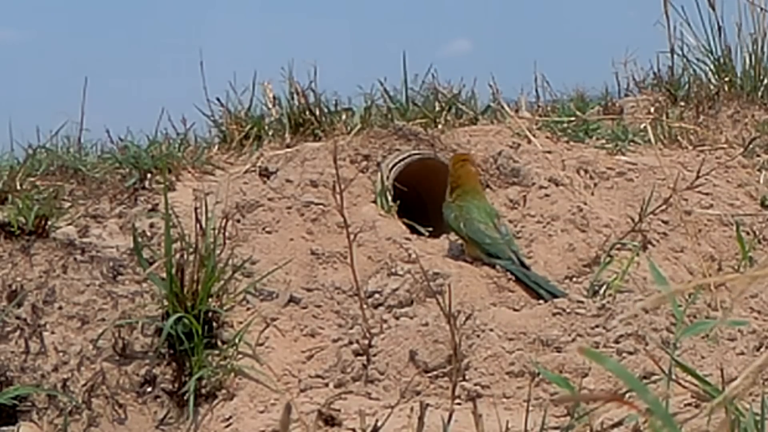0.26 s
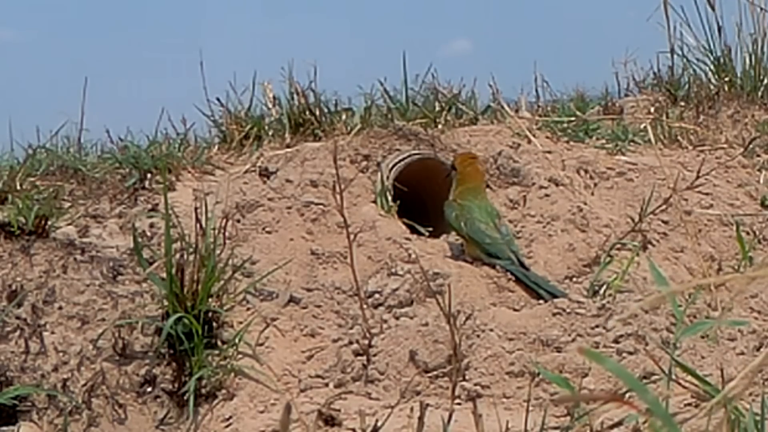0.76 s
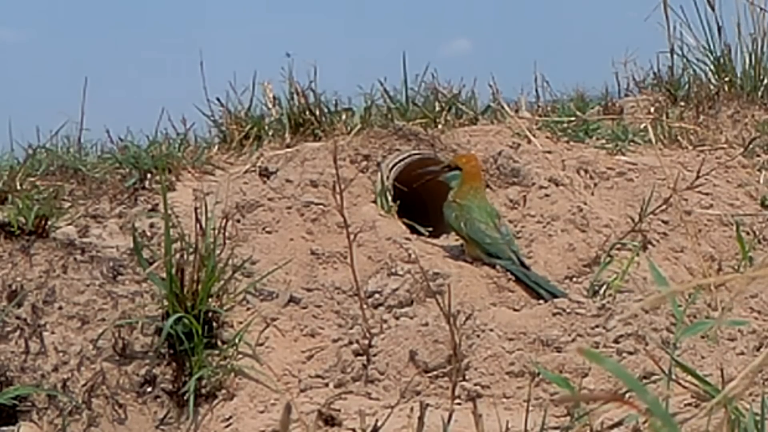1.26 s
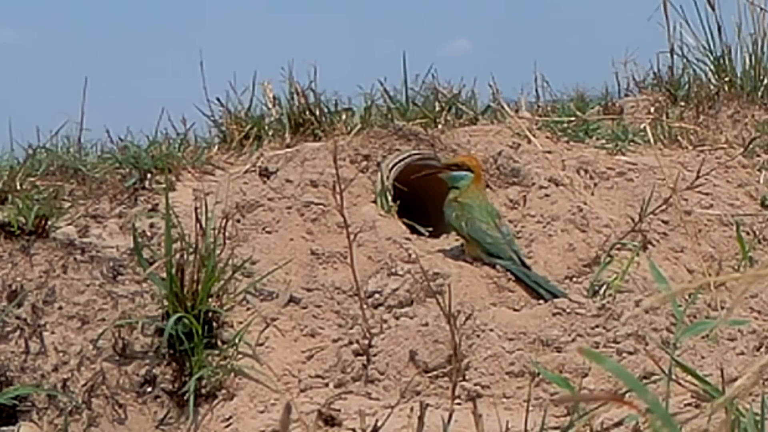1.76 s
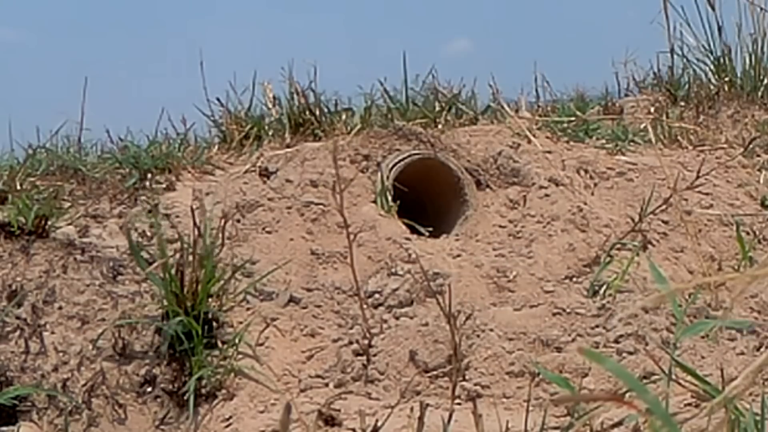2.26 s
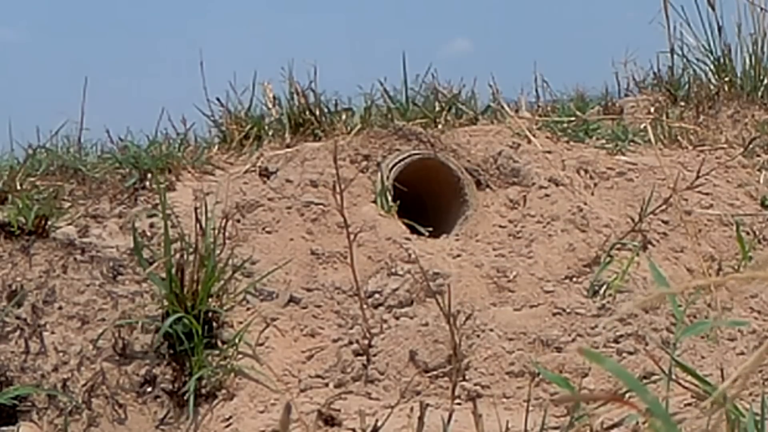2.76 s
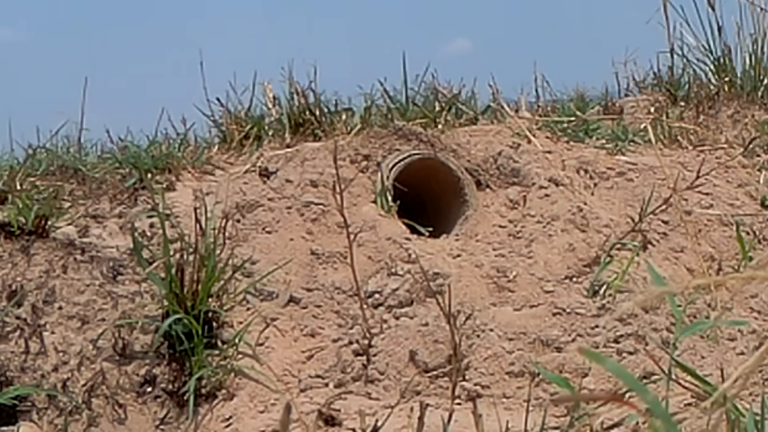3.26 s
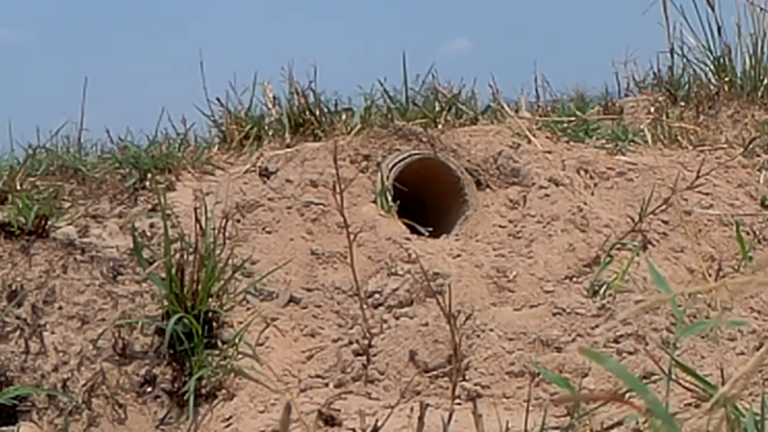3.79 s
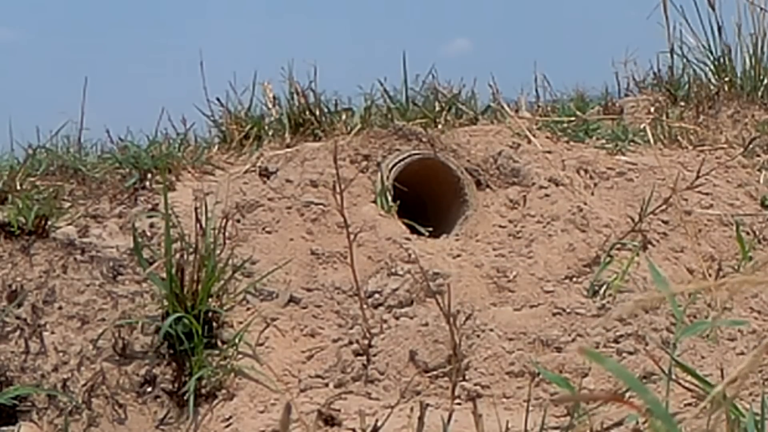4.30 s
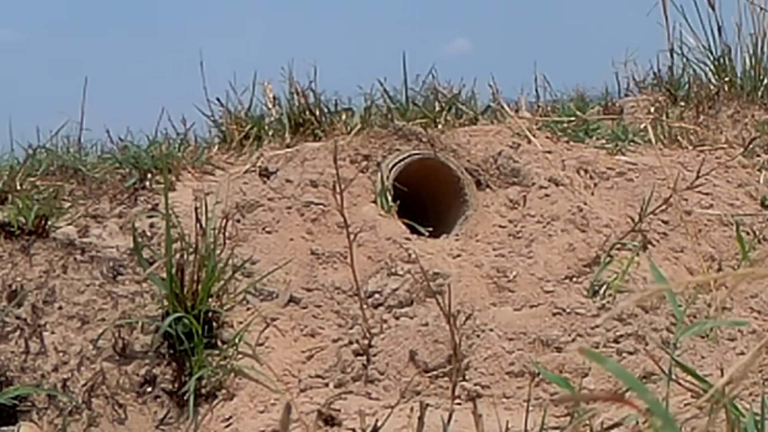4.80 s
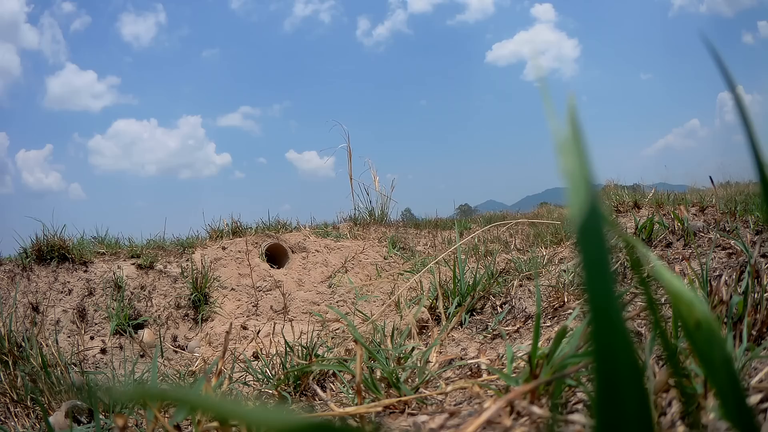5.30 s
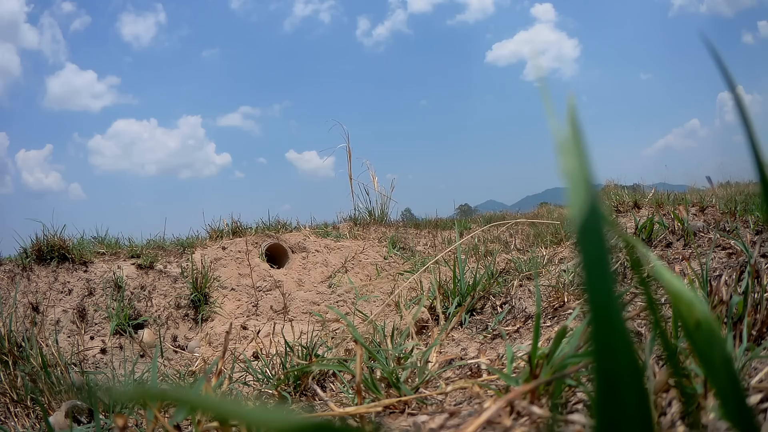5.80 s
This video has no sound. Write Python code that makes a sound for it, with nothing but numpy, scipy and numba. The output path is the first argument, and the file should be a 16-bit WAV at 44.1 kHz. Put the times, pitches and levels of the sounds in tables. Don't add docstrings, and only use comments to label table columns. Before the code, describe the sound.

A small camera outdoors picks up soft hiss and a faint distant bird repeating an arched whistle, a slowing trill and a short downward slide. At two seconds a bee-eater leaves its burrow in a sand bank with ten rapid high chirps, each rising then falling with tiny clucks between. They grow loud, then fade as it flies off. Extra hiss lingers and slowly dies, with one tiny dip near the end.

```python
import sys
import numpy as np
from scipy import signal
from scipy.fft import rfft, irfft
from scipy.io import wavfile
from scipy.ndimage import uniform_filter1d
from numba import njit

SR = 44100
rng = np.random.default_rng(int(sys.argv[2]) if len(sys.argv) > 2 else 0)


def dump(signal):
    limited = np.clip(np.atleast_2d(signal).T, -1, 1)
    pcm = np.round(limited * 32767).astype(np.int16)
    wavfile.write(sys.argv[1], SR, pcm)


def gain_from_decibels(decibels):
    exponent = np.asarray(decibels, float) / 20
    return 10 ** exponent


N = 266805
T = np.arange(N) / SR

# t/s, length/ms, top f/Hz, level/dB, warble/0-1
ARCHES = [
    (-.035, 83, 3400, -55, 0.78),
    (0.108, 62, 3940, -50.5, 0.76),
    (0.549, 65, 4010, -53.5, 1),
    (.938, 75, 4250, -48, 0.15),
    (1.303, 65, 4320, -49.5, 0),
    (1.714, 61, 4380, -49.5, .15),
    (2.159, 55, 4150, -45.5, 0.4),
]
# first pulse t/s, slowing/us per pulse squared, end t/s
TRILLS = [
    (.1684, 10, .461),
    (.6065, 5.1, .846),
    (.9887, 8, 1.21),
    (1.3641, 24.6, 1.607),
    (1.7743, 13.5, 2.082),
    (2.2278, 32, 2.386),
]
# low start level/dB, low end level/dB, high f/Hz, high start level/dB,
# high end level/dB
TRILL_VOICES = [(-55.5, -57, 3000, -71, -53.5), (-58, -51.5, 3220, -56, -60), (-53, -48.5, 3220, -64, -58),
                (-47.5, -51, 2500, -68, -56), (-50.5, -48.5, 3220, -63, -60), (-46, -45, 3500, -64, -51)]
# f/Hz, level/dB per Hz
HISS_COLOUR = [(12, -37), (20, -7), (101, -4.5), (141, -3.5), (275, -3.5), (344, -3), (406, -3),
               (672, -4.5), (887, -6), (965, -6), (3110, -13), (11200, -20.5), (15700, -26.5)]
# f/Hz, level/dB per Hz
OPEN_GATE_COLOUR = [(100, -41), (500, 5.5), (1500, 6), (4000, 1.5), (8000, -2.5), (12000, -6), (15700, -11)]
DULL_FRAMES = [0, 3, 4, 5, 9, 13, 16, 19, 23, 26]
# t/s, length/ms, middle f/Hz, end f/Hz, level/dB
RISES = [
    (2.0419, 13.3, 3150, 3400, -29.5),
    (2.1185, 15.7, 3130, 3320, -24.5),
    (2.2081, 17.8, 3400, 3380, -16.2),
    (2.3205, 21.4, 3440, 3470, -16.3),
    (2.4491, 23.5, 3500, 3660, -17.8),
    (2.5505, 20.1, 3340, 3563, -21.3),
    (2.6613, 20.7, 3400, 3200, -23),
    (2.7711, 20.1, 3320, 3380, -28),
    (2.8865, 17.8, 3270, 3350, -27.3),
    (3.0529, 17.4, 3220, 3350, -30.5),
]
# t/s, length/ms, start f/Hz, end f/Hz, level/dB
FALLS = [
    (2.0697, 9.6, 3600, 3140, -27.5),
    (2.1479, 8.7, 4080, 3380, -22.5),
    (2.2395, 11.4, 4010, 3610, -18),
    (2.355, 12.2, 4040, 3540, -16.5),
    (2.4859, 13.6, 4050, 3560, -21.5),
    (2.5851, 12.5, 4030, 3730, -22.5),
    (2.6964, 12.3, 4130, 3730, -23.4),
    (2.8063, 10.7, 4140, 3860, -23),
    (2.92, 8.4, 4050, 3730, -25),
    (3.0847, 10.9, 3940, 3530, -27),
]
# share of the rise spent swelling/1, late growth of the rise/dB,
# fading of the fall/dB, hump of the fall/dB
BREATHS = [(0.55, -5, -7, -2), (1.1, 6.5, -3, -1), (0.53, -1, -4, 2), (0.49, -1.5, -5.5, -1.7),
           (0.64, -0.2, -5, -2), (0.55, -2, -7.5, 1.5), (.44, -.6, -2, 1.5), (0.5, .5, -7.5, 3),
           (.62, -1, -8.5, .5), (.8, 0, -9.5, -3.5)]
# shutting level/dB, reopening level/dB, last level/dB
CLUCK_LEVELS = [(-34.5, -34, -51), (-27.5, -26, -38), (-27, -28.5, -39), (-28.5, -27.5, -39),
                (-36, -36, -44), (-34.5, -36, -42.5), (-45, -36.5, -43), (-44, -37, -47), (-49, -38.5, -51),
                (-48, -45, -57)]
# lead/ms, length/ms, start f/Hz, end f/Hz, attack/0-1, release/0-1
SHUTTING = [(0.83, 7.5, 2010, 2400, 0.15, 1), (.5, 11.3, 2110, 2300, 0.17, 0.87)]
REOPENING = [(3.0, 3.9, 2120, 2990, 0.11, 0.61), (4.6, 6.4, 2180, 3620, 0.3, 0.32)]
LAST_CLUCK = (.75, 3.6, 2750, 660, 0.086, 0.59)

ARCH_FROM_HZ, ARCH_TO_HZ, WARBLE_HZ = (2920, 3060), (2500, 2770), (80, 230)
ARCH_FADE_DB, ARCH_OCTAVE_DB = (-11, 2.5), (-21, -11)
WARBLE_MS, WARBLE_TOP_MS = 9.3, 10
TRILL_MS = 8.15
LOW_HZ, LOW_SAG_HZ, LOW_LIFT_HZ = 2360, -40, 120
LOW_DIP_DB, HIGH_DIP_DB = -1, -0.5
CLOSE_AFTER_MS, CLOSE_MS, CLOSE_FROM_HZ, CLOSE_TO_HZ, CLOSE_DB = 4.1, 12.5, 2550, 2240, -0.3
EARLIER_CLOSE_S, EARLIER_CLOSE_DB = 0.0273, -52.5
BOUNCE_MS, BOUNCE_DB, ECHO_DB, ECHO_T60_S = 3.1, -25, -26, 0.02
CAMERA_HZ, IMAGE_DB, TOP_HZ = 16000, -30.5, 15750
HISS_DB, OPEN_DB, GATE_DB, GATE_T60_S = -54.5, -53, -35.5, 2.4
DULL_ABOVE_HZ, DULL_DB, FRAME_S, FIRST_FRAME_S = 8600, -26, .032, 2.0313
DIP_S, DIP_MS = 5.3102, 5.5
RISE_FROM_HZ, FLICK_HZ, FLICK_DB, SWELL_DB, SWELL_STEEP = 2920, 265, 2.5, -14.5, 1.2
TAKE_OFF_S, TURN_S, TURN_TAKES_S = 2.04, 2.36, .11
RISE_OCTAVE_DB, OCTAVE_DB_PER_S = -50, -9.5
FALL_OCTAVE_DB, FALL_SAG_HZ, FALL_MIRROR_DB = -37.5, -13, 0.5
SNAP_HZ, SNAP_MS = 910, .5
SHUT_OCTAVE_DB, REOPEN_OCTAVE_DB, LAST_OCTAVE_DB = -19, -14.5, -19


def note(start, ms, pitch, gain, octave_db):
    u = (T - start) / (ms / 1000)
    span = (u > 0) & (u < 1)
    phase = 2 * np.pi * (np.cumsum(pitch(u[span])) / SR + rng.random())
    out = np.zeros(N)
    out[span] = gain(u[span]) * (np.sin(phase) + gain_from_decibels(octave_db) * np.sin(2 * phase))
    return out


def edge(u, share):
    return np.sin(np.pi / 2 * np.clip(u / share, 0, 1)) ** 2


def mix(pair, share):
    return (1 - share) * np.asarray(pair[0]) + share * np.asarray(pair[1])


def arch(s, ms, top, db, warbled):
    pairs = (ARCH_FROM_HZ, ARCH_TO_HZ, WARBLE_HZ, ARCH_FADE_DB, ARCH_OCTAVE_DB)
    start, end, warble, fade_db, octave_db = (mix(pair, warbled) for pair in pairs)
    flutter_db = 2.5 * rng.standard_normal(16)

    def wave(u):
        return np.cos(2 * np.pi * (u * ms - WARBLE_TOP_MS) / WARBLE_MS) * edge(u, 0.17)

    def pitch(u):
        hump = 1 - np.abs(1 - 2 * u ** .72) ** 1.05
        return start + (end - start) * u + (top - 0.7 * start - .4 * end) * hump + warble * wave(u)

    def gain(u):
        level = db + fade_db * np.sin(np.pi * u ** .75) ** 2 - 2.4 * u - 1.5 * wave(u)
        level = level + np.interp(u, np.linspace(0, 1, 16), flutter_db)
        return gain_from_decibels(level) * edge(u, 0.029) * edge(1 - u, 0.27)

    return note(s, ms, pitch, gain, octave_db)


def trill(first, slowing, end, from_db, to_db, high_hz, *high_db):
    out = np.zeros(N)
    k = np.arange(40)
    times = first + k * TRILL_MS / 1000 + k * k * slowing / 1e6
    for t, (low, high, off) in zip(times[times < end], rng.standard_normal((40, 3))):
        done = (t - first) / (end - first)
        sag = np.sin(np.pi * done ** 0.23)
        low_hz = LOW_HZ + LOW_SAG_HZ * sag + LOW_LIFT_HZ * done ** 2 + 60 * off + 30
        low_level = mix((from_db, to_db), done) + LOW_DIP_DB * sag + 1.6 * low
        high_level = mix(high_db, done) + HIGH_DIP_DB * sag + 0.79 * high
        out += note(t - .0027, 6.6, lambda u: low_hz + 550 * (.5 - u),
                    lambda u: gain_from_decibels(low_level) * np.sin(np.pi * u) ** 2, -32)
        out += note(t + 0.00097, 9.0, lambda u: high_hz + 90 * off + 350 * (u - .5),
                    lambda u: gain_from_decibels(high_level) * np.sin(np.pi * u) ** 2, -30)
    return out


def closing_slide(s, db):
    return note(s, CLOSE_MS, lambda u: CLOSE_FROM_HZ + (CLOSE_TO_HZ - CLOSE_FROM_HZ) * u ** 0.9,
                lambda u: gain_from_decibels(db) * edge(u, 0.3) * edge(1 - u, .3), -30)


def far_bird():
    out = closing_slide(EARLIER_CLOSE_S, EARLIER_CLOSE_DB)
    for row in ARCHES:
        out += arch(*row)
    for (first, slowing, end), voices in zip(TRILLS, TRILL_VOICES):
        out += trill(first, slowing, end, *voices)
        low_end_db = voices[1]
        out += closing_slide(end + CLOSE_AFTER_MS / 1000, low_end_db + CLOSE_DB)
    return out


def sand_bank(x):
    t = T[:SR // 8]
    tail = rng.standard_normal(len(t)) * gain_from_decibels(-60 * t / ECHO_T60_S) * (t > .0025)
    tail = tail / np.linalg.norm(tail)
    bounce = gain_from_decibels(BOUNCE_DB) * np.interp(T - BOUNCE_MS / 1000, T, x)
    return x + bounce + gain_from_decibels(ECHO_DB) * signal.fftconvolve(x, tail)[:N]


def camera_image(notes):
    return gain_from_decibels(IMAGE_DB) * notes * np.cos(2 * np.pi * CAMERA_HZ * T)


def noise(spectrum, db):
    hz, level = np.transpose(spectrum)
    f = np.maximum(np.arange(N // 2 + 1) * SR / N, 1)
    x = irfft(rfft(rng.standard_normal(N)) * gain_from_decibels(np.interp(np.log(f), np.log(hz), level)), N)
    return x * gain_from_decibels(db) / x.std()


@njit
def gate(loud, keep):
    opening, held = np.empty(len(loud)), 0.
    for i in range(len(loud)):
        held = max(loud[i], held * keep)
        opening[i] = held
    return opening


def hiss(birds):
    loud = np.clip(uniform_filter1d(np.abs(birds), size=220) / gain_from_decibels(GATE_DB), 0, 1)
    keep = float(gain_from_decibels(-60 / (GATE_T60_S * SR)))
    opened = uniform_filter1d(gate(loud, keep), size=600)
    x = noise(HISS_COLOUR, HISS_DB) + opened * noise(OPEN_GATE_COLOUR, OPEN_DB)
    high_pass = signal.cheby1(8, .1, DULL_ABOVE_HZ, "high", fs=SR, output="sos")
    treble = signal.sosfiltfilt(high_pass, x)
    frame = np.floor((T - FIRST_FRAME_S) / FRAME_S)
    dull = uniform_filter1d(1. * np.isin(frame, DULL_FRAMES), size=130) ** 3
    return x - (1 - gain_from_decibels(DULL_DB)) * dull * treble


def rising_whistle(s, ms, mid, end, db, swell, grow_db):
    bend = 2 * mid - (RISE_FROM_HZ + end) / 2

    def pitch(u):
        curve = (1 - u) ** 2 * RISE_FROM_HZ + 2 * u * (1 - u) * bend + u * u * end
        return curve + FLICK_HZ * u ** 14

    def gain(u):
        level = db + SWELL_DB * np.clip(1 - u / swell, 0, 1) ** SWELL_STEEP
        level = level + grow_db * np.clip(2 * u - 1, 0, 1) + FLICK_DB * u ** 6
        return gain_from_decibels(level) * edge(u, 0.03) * edge(1 - u, 0.054)

    octave_db = RISE_OCTAVE_DB + OCTAVE_DB_PER_S * (s - TAKE_OFF_S) - db
    return note(s, ms + 0.53, pitch, gain, octave_db)


def cluck(at, shape, db, octave_db, snap_hz=0):
    lead, ms, start, end, attack, release = shape
    return note(at - lead / 1000, ms,
                lambda u: start + (end - start) * u ** 0.95 + snap_hz * np.exp(-u * ms / SNAP_MS),
                lambda u: gain_from_decibels(db) * edge(u, attack) * edge(1 - u, release), octave_db)


def falling_whistle(s, ms, top, low, db, fade_db, hump_db):
    return note(s - .0004, ms + 2.0,
                lambda u: top + (low - top) * 1.26 * u + FALL_SAG_HZ * np.sin(np.pi * u),
                lambda u: gain_from_decibels(db + fade_db * u + hump_db * np.sin(np.pi * u)) * edge(u, 0.11) * edge(1 - u, 0.2),
                FALL_OCTAVE_DB)


def bee_eater():
    out, mirrored = np.zeros(N), np.zeros(N)
    for rise_row, fall_row, breath, levels in zip(RISES, FALLS, BREATHS, CLUCK_LEVELS):
        swell, grow_db, fade_db, hump_db = breath
        shut_db, open_db, last_db = levels
        rise_s, rise_ms, rise_db = rise_row[0], rise_row[1], rise_row[4]
        fall_s, fall_ms = fall_row[:2]
        rise = rising_whistle(*rise_row, swell, grow_db)
        fall = falling_whistle(*fall_row, fade_db, hump_db)
        away = np.clip((rise_s - TURN_S) / TURN_TAKES_S, 0, 1)
        shut_octave_db = rise_db + SHUT_OCTAVE_DB - shut_db
        out += rise + fall
        out += cluck(rise_s + rise_ms / 1000, mix(SHUTTING, away), shut_db, shut_octave_db, SNAP_HZ)
        out += cluck(fall_s, mix(REOPENING, away), open_db, REOPEN_OCTAVE_DB)
        out += cluck(fall_s + fall_ms / 1000, LAST_CLUCK, last_db, LAST_OCTAVE_DB)
        mirrored += rise + gain_from_decibels(FALL_MIRROR_DB) * fall
    return out, mirrored


def scene():
    far = far_bird()
    near, mirrored = bee_eater()
    birds = sand_bank(near + far)
    return (birds + camera_image(mirrored + far) + hiss(birds))[None]


def band_limit(x):
    return signal.sosfilt(signal.butter(12, 15840, fs=SR, output="sos"), x)


def record(dry):
    dip = np.clip(np.abs(T - DIP_S) / (DIP_MS / 1000), 0, 1)
    low_pass = signal.ellip(10, .2, 60, TOP_HZ, fs=SR, output="sos")
    finished = signal.sosfilt(low_pass, dry * dip)
    return band_limit(finished)


dry = scene()
out = record(dry)
dump(out)
```